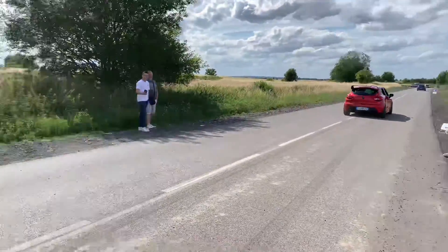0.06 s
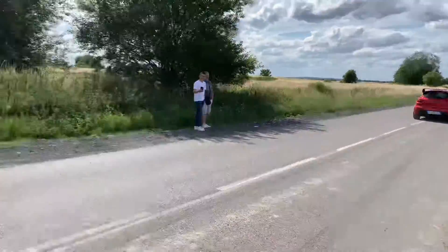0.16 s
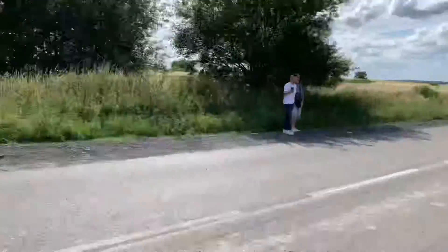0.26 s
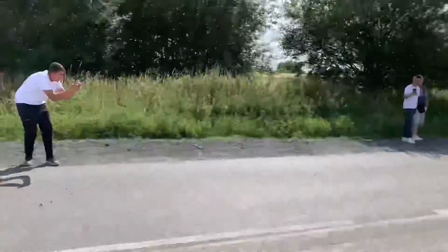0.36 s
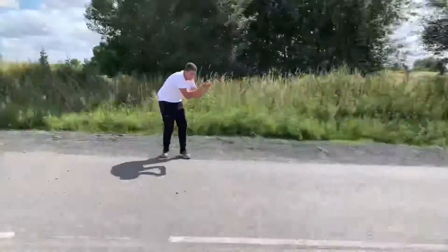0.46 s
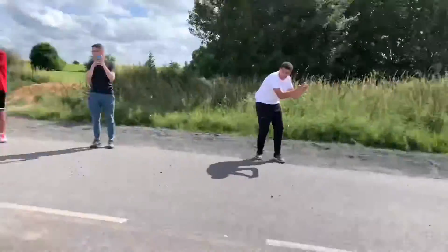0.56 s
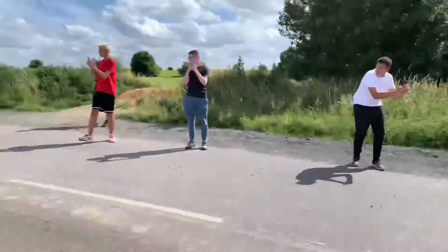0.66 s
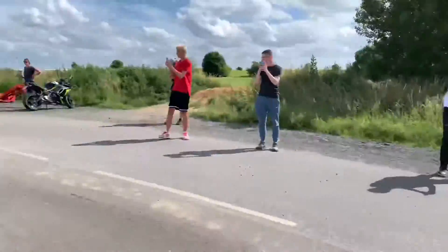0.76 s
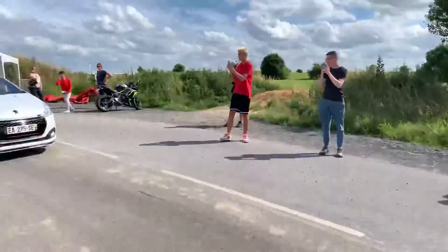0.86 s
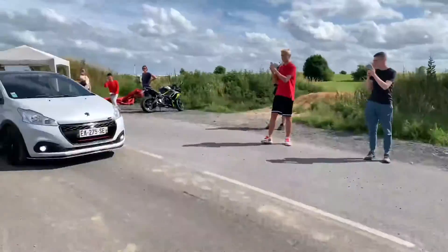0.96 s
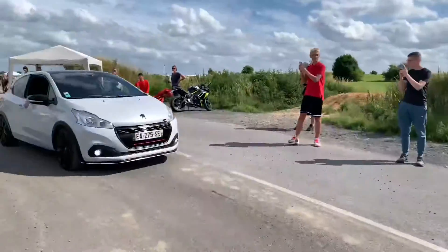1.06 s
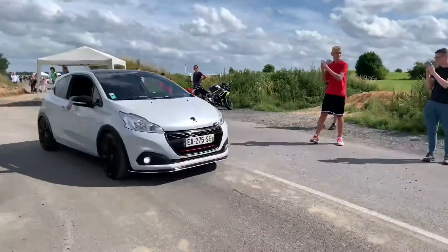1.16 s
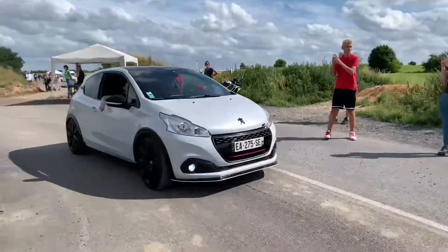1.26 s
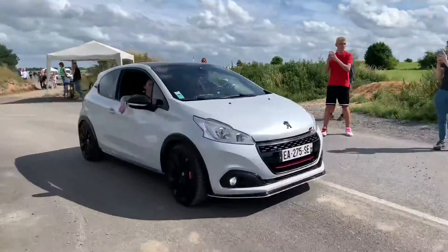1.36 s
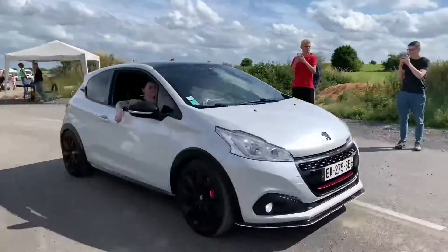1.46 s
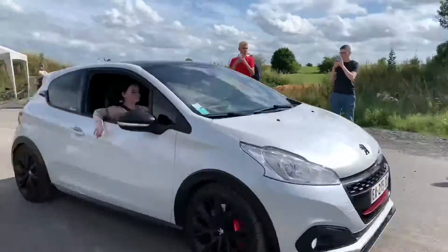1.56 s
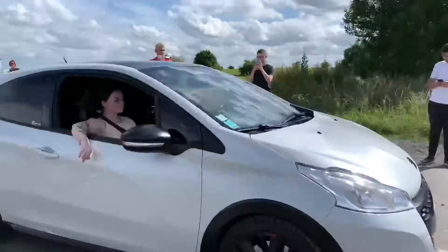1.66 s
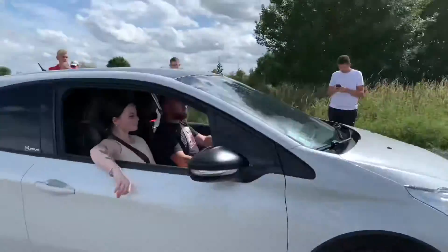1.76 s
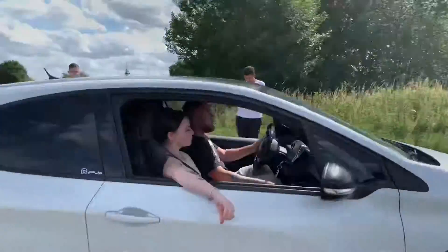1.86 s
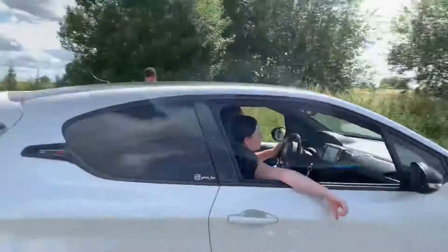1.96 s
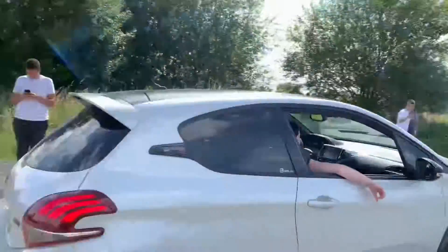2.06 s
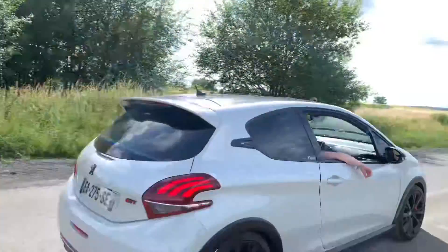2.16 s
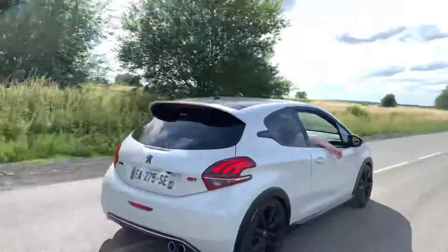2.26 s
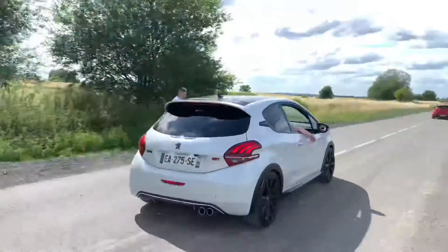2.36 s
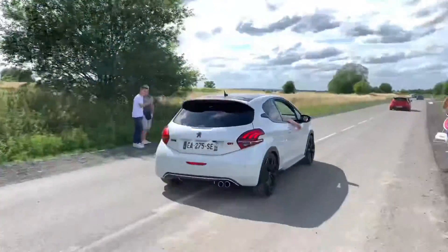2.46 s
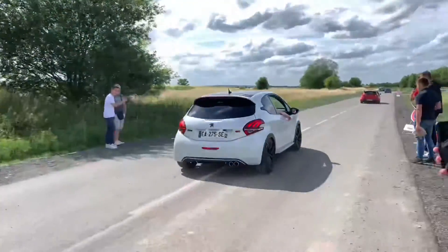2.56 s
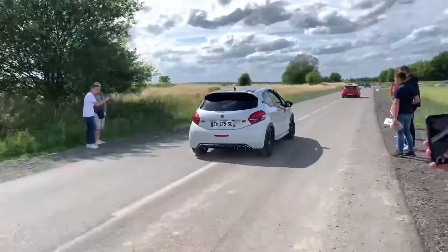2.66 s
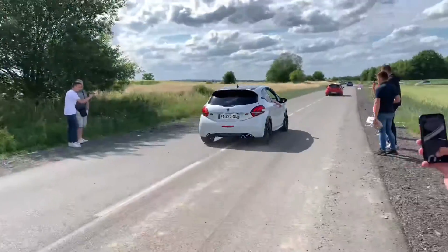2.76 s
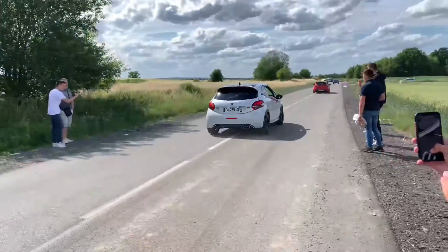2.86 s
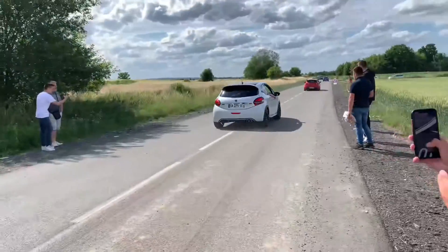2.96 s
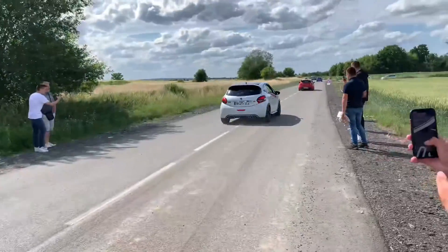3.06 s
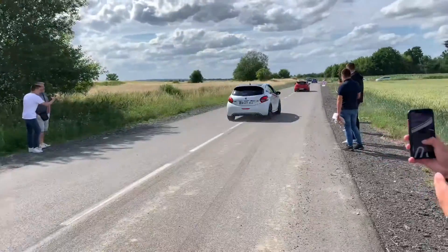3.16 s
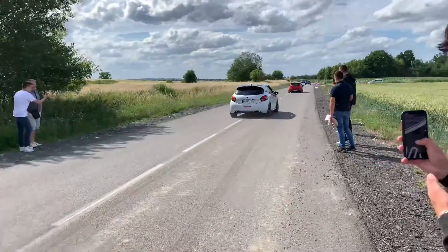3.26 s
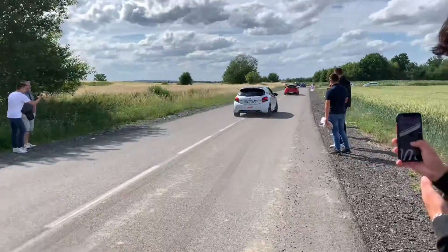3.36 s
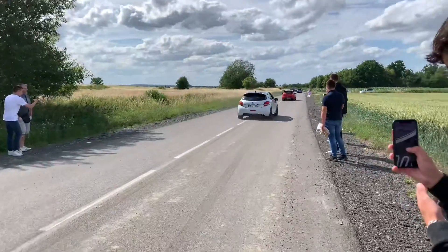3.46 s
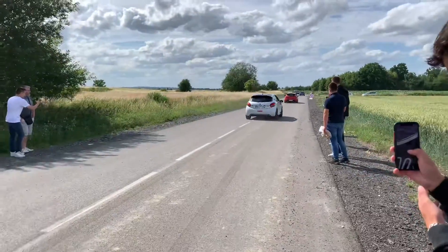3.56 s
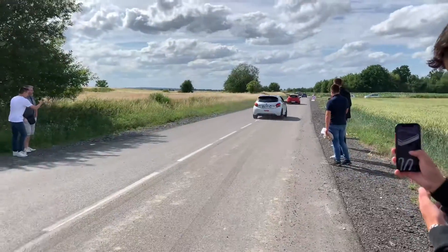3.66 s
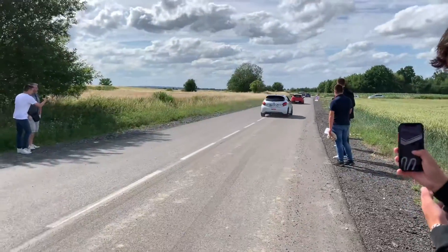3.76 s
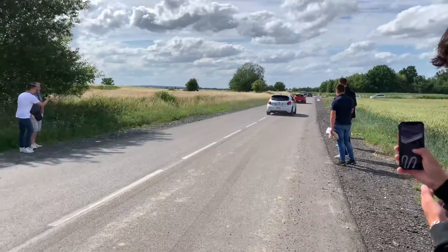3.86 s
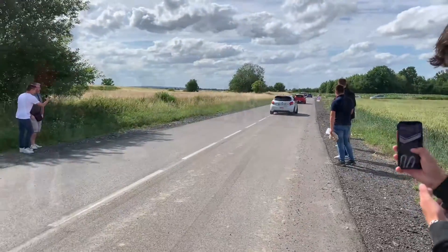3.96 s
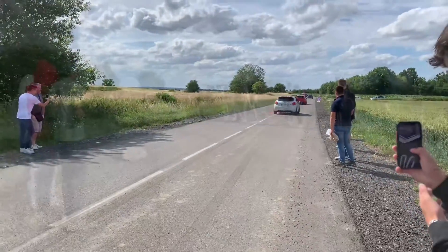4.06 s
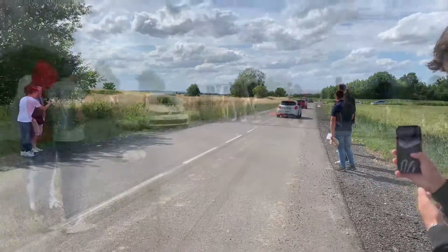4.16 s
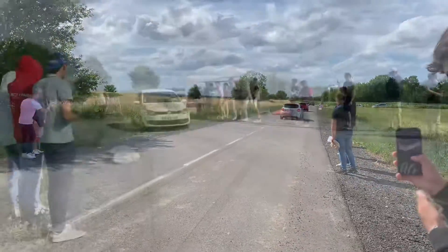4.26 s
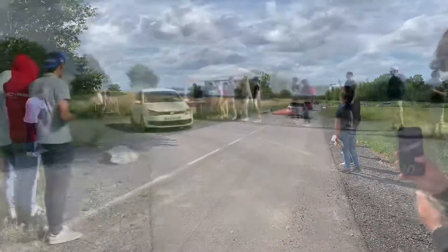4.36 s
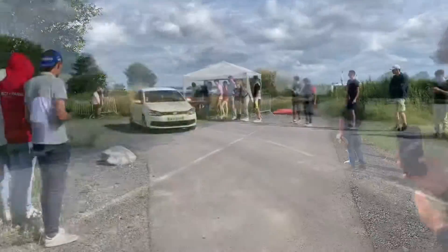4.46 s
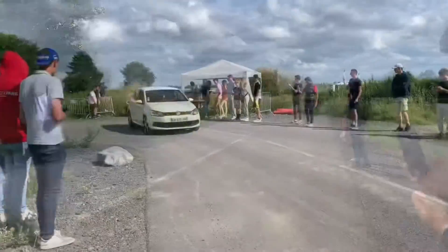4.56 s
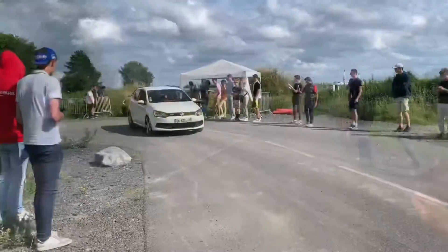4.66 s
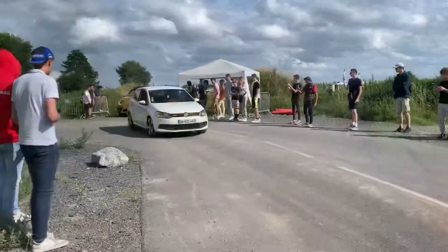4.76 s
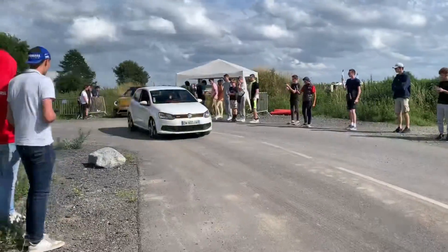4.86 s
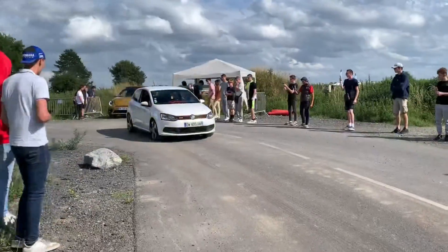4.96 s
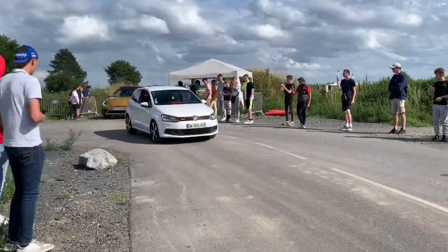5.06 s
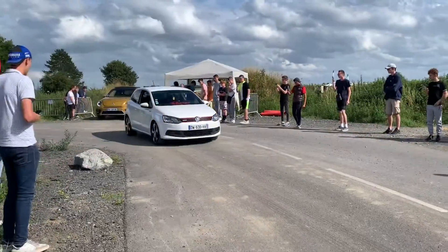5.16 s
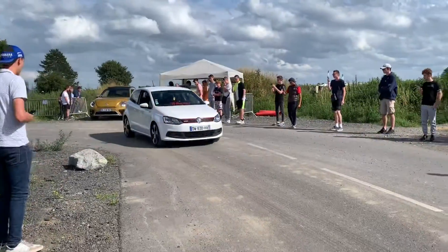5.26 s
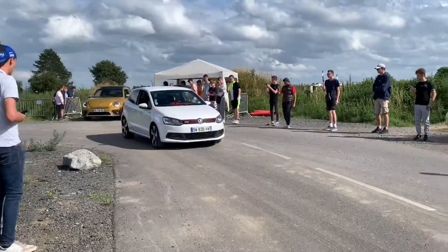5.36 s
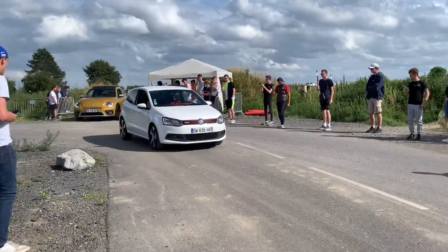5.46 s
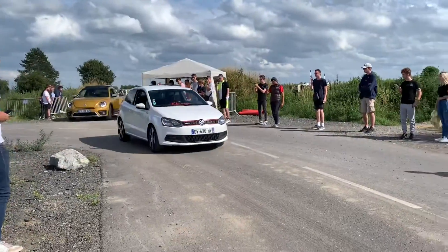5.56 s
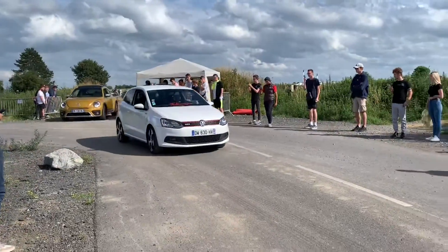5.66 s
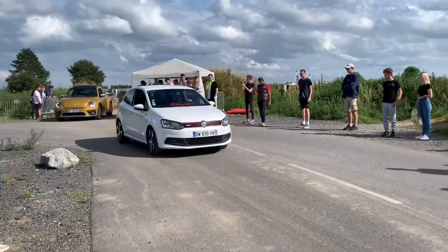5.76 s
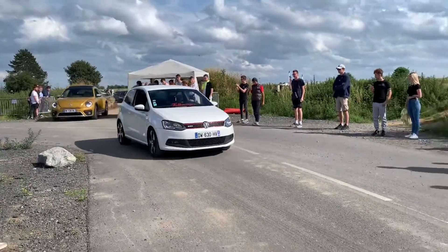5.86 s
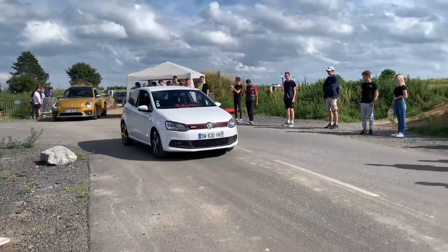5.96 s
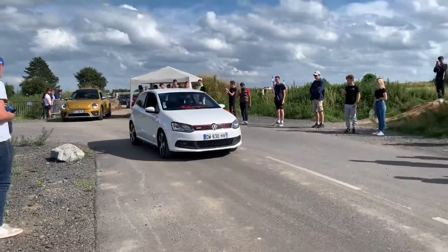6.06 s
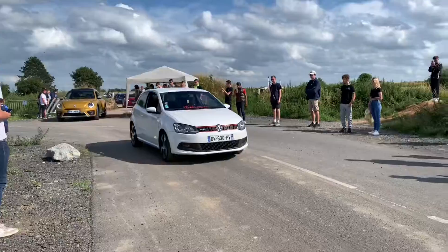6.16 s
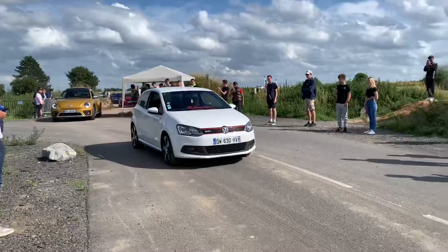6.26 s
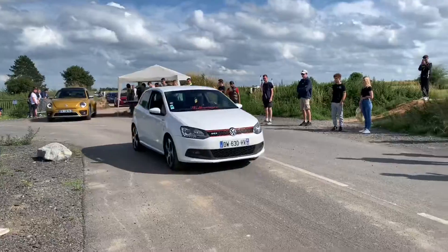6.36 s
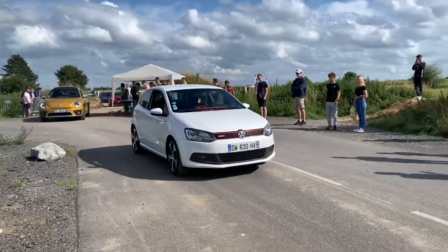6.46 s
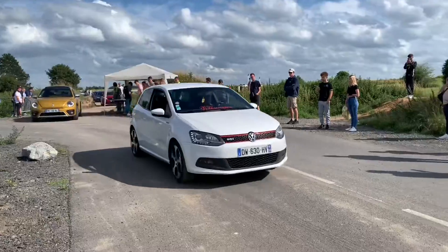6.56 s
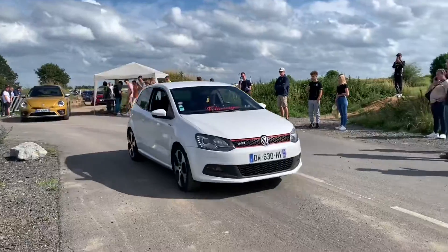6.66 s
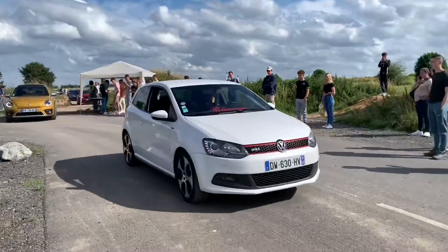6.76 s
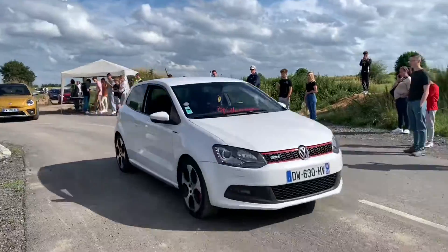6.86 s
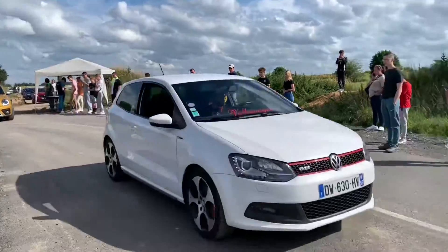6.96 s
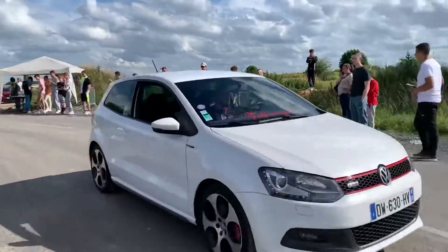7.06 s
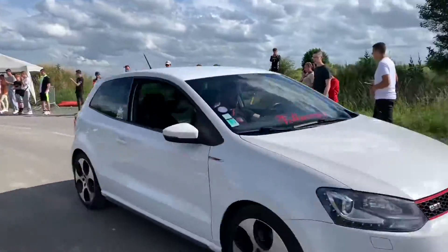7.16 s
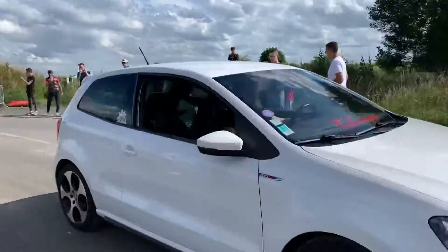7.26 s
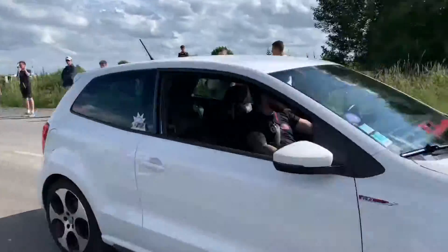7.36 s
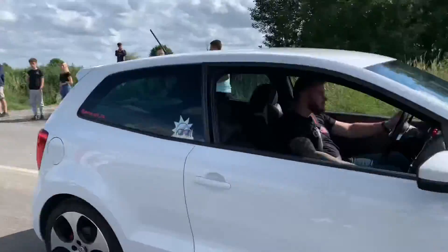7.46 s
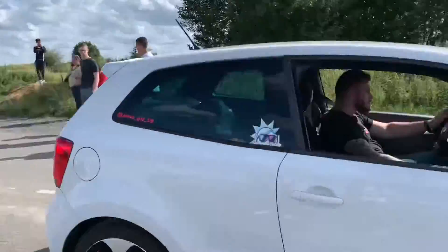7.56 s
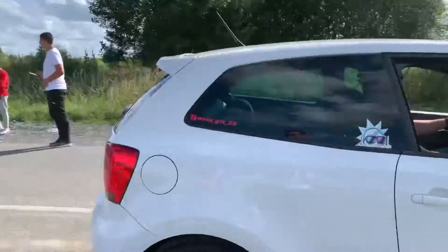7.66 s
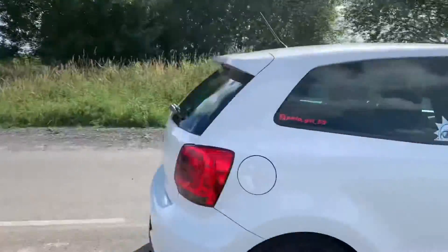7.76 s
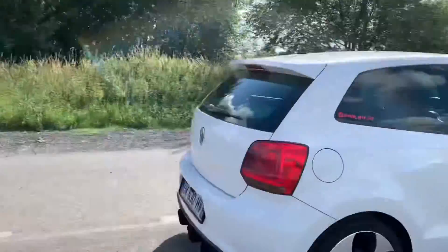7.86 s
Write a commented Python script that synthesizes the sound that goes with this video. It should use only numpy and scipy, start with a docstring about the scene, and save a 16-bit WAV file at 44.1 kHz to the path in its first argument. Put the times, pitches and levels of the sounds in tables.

```python
"""Two small four-cylinder cars pull away one after the other on a country road, close past a recorder.
Each firing pulse rings pipe, intake and tailpipe resonances, with clean sine booms underneath.
The first car revs out, lifts off with a crack, pops and is heard far off in another gear; the second
rolls near with a banded whirr and booms past. Shaped noise makes the rolling sound and the wind on the
microphone ports; struck modes make a few dull knocks, and gliding sines make thin squeaks."""
import sys
import numpy as np
from scipy import signal
from scipy.fft import rfft, irfft
from scipy.io import wavfile
from scipy.ndimage import uniform_filter1d, map_coordinates

SR = 44100
rng = np.random.default_rng(int(sys.argv[2]) if len(sys.argv) > 2 else 0)


def persist_wave(psi):
    """Save psi, clipped to +-1, as 16-bit WAV."""
    counts = np.round(np.clip(psi, -1, 1) * 32767).astype(np.int16)
    wavfile.write(sys.argv[1], SR, np.atleast_2d(counts).T)


N = 348831

# Engine levels of the cars. Each row: time in seconds, base level of the firing tone in dB,
# base level of the exhaust rasp in dB.
FIRST_LEVELS = [(0.0, -62, -82), (0.36, -32, -45.5), (0.5, -33, -36.5), (0.53, -29.5, -36.5),
                (0.74, -33, -34.5), (0.9, -20.5, -27.5), (1.24, -19, -21), (1.6, -15, -16.5),
                (1.85, -14, -15), (1.97, -16.5, -15.5), (2.03, -14.5, -21.5), (2.12, -17.5, -24),
                (2.3, -22.5, -19), (2.53, -21, -22), (2.79, -31.5, -24), (2.825, -31.5, -39),
                (3.01, -30.5, -46), (3.031, -25, -28), (3.151, -39.5, -39), (3.31, -32.5, -30),
                (3.46, -36, -33.5), (3.53, -33, -41), (3.6, -35, -59)]
FAR_LEVELS = [(3.68, -44.5, -51), (4.126, -42, -64.5), (4.75, -55, -81)]   # the first car far off in another gear
SECOND_LEVELS = [(4.6, -47, -69.5), (5.31, -48, -61), (5.78, -73, -58), (5.98, -41, -52.5),
                 (6.18, -47.5, -50.5), (6.53, -41.5, -54), (6.89, -30.5, -38), (7.12, -25, -35),
                 (7.25, -29.5, -54), (7.33, -19, -56), (7.42, -14, -57), (7.52, -16, -38),
                 (7.65, -15.5, -52.5), (7.91, -16.5, -58)]
# Engine speeds before flywheel smoothing. Each row: time in seconds, firings per second.
FIRST_REVS = [(0.0, 62.5), (0.5, 73), (0.74, 83), (0.9, 91), (1.24, 110.4), (1.6, 142), (1.85, 168),
              (1.97, 182), (2.03, 187), (2.12, 190.5), (2.3, 200), (2.53, 201), (2.79, 199), (3.01, 191),
              (3.15, 167), (3.31, 140.6), (3.46, 116.4), (3.6, 93.7)]
FAR_REVS = [(3.68, 128.7), (4.126, 117), (4.75, 105)]
SECOND_REVS = [(4.6, 62.5), (5.4, 63.8), (5.62, 65), (5.79, 75), (6.07, 81), (6.18, 82), (6.53, 96),
               (6.8, 107), (6.95, 116.5), (7.13, 119.5), (7.25, 117.5), (7.4, 114), (7.6, 108),
               (7.91, 99.5)]
# Character of the four cylinders before the unevenness scales it: strength in dB; lateness in firing gaps.
CYLINDER_DB = [5, 3, -3, 5.5]
CYLINDER_LATE = [-0.024, 0.055, -0.04, 0.13]
# How unlike the cylinders fire. Each row: firings per second, share from 0 to 1.
UNEVEN = [(65, 0.49), (110, 0.44), (165, 0.87), (195, 1)]
# Cycle-to-cycle roughness off the overrun. Each row: firings per second, roughness from 0 to 1.
ROUGH = [(65, .1), (110, .09), (165, .1), (190, .04)]
OVERRUN_FALL_PER_S, OVERRUN_ROUGH = 150, .06   # firings/s lost per s at full overrun; roughness it adds
OVERRUN_MULTIPLES_DB = -2   # the clean multiples sink on the overrun
FIRST_PUFF, SECOND_PUFF = .55, .5   # turbulent gas behind each pulse

# Resonances. Each row: centre in Hz, width in Hz, relative level in dB.
FIRST_PIPE = [(300, 280, -4.5), (438, 79, 4.5), (513.3, 43, 8.5), (572.4, 95, 7), (759, 52, 1)]
SECOND_PIPE = [(54.6, 140, 6.5), (327, 54, 5), (512, 45, 5), (762, 39, 4.5), (1200, 73, -1)]
TAILPIPE = [(915, 220, 18), (1273, 150, 19.5), (1726, 59, 9), (2027, 230, 9), (2420, 260, 10),
            (2760, 500, 3.5), (3170, 300, -1), (3920, 160, 4), (5000, 150, -17), (6560, 170, -0.5)]
INTAKE = [(670, 61, -1), (683, 75, 7.5), (1236, 124, 0), (1800, 110, -8), (2450, 81, -28)]   # heard from the front only
INTAKE_DB = -2.5   # against the rasp
INTAKE_HIDES_AT_M, INTAKE_HIDES_OVER_M = -3.2, 0.62   # the bonnet passes and the body hides the intake
# Bite of the tailpipe against the rasp, in dB, by the side the car shows.
TAILPIPE_DB = {"front": -48, "behind": 3.5}
BITE_LOSS_DB_PER_M, BITE_FADES_OVER_M = 0.77, 9.4   # extra fading of the bite once past, then it holds
DULLING_DB_PER_M_KHZ = 0.2   # the bite dulls with distance along the road
# Band of the tailpipe jet: low edge and high edge in Hz.
JET_HZ = [850, 3380]
JET_DB, JET_LOSS_DB_PER_M = -13, 1.1   # against the rasp; fading with distance along the road
JET_BEAT = .65   # share of the jet that beats with the firings

# Base levels of the 2nd, 3rd and 4th multiple of the firing tone, in dB against the tone.
FIRST_MULTIPLES = [0.37, -4.5, -12]
FAR_MULTIPLES = [-9, -23, -13]
SECOND_MULTIPLES = [-1.1, -41, -12]
# How the silencers pass a multiple, by the side the car shows. Each row: pitch in Hz, gain in dB.
FIRST_SILENCER = {"front": [(130, 14.5), (200, -11), (300, -5.5), (380, -5), (440, -11.5), (530, 12.5),
                  (610, 11.5), (680, -13), (800, 3)], "behind": [(130, 4.5), (200, -21), (300, -4),
                  (395, -1), (450, 14), (530, 12), (610, -11), (700, -6), (800, 4)]}
SECOND_SILENCER = {"front": [(130, -6.5), (220, -6.5), (350, -3), (440, -13), (490, 9)],
                   "behind": [(130, 34), (220, -3), (350, -26), (440, -23), (490, -17)]}
MULTIPLES_FOLLOW_RASP = 0.48   # how far the multiples lean from the tone's level to the rasp's
TONE_WAVERS_DB = 1.4

ROLL_M_PER_FIRING, LANE_M = .062, 1.7   # road covered per firing; closest distance across the road
# Place along the road in metres as each engine is first heard; negative is still approaching.
START_M = {"first": -12.8, "far": 22.0, "second": -15.5}
# Road in metres over which the car's tail comes into view.
TURN_M = {"first": .8, "second": .2}
# Share of the exhaust that the road sends back up close, from 0 to 1, by the side the car shows.
ECHO_SHARE = {"front": .25, "behind": 1.0}
PIPE_HEIGHT_M, PORT_HEIGHT_M = .25, 1.5
ECHO_FADES_M, ASPHALT_CUT_HZ = 80.0, 5000

# Exhaust cracks and pops. Each row: start in seconds, peak of the blast before ringing in dB,
# upper edge of its band in Hz.
POPS = [(0.75, -41, 5900), (2.735, -33, 5000), (2.75, -36, 4500), (2.788, -28.5, 6460), (3.020, -32, 1270),
        (3.035, -28, 300), (3.045, -31, 1200), (3.055, -38.5, 2740), (3.067, -33, 1040), (3.26, -42, 2210),
        (3.336, -40, 2200), (3.42, -41.5, 8000), (3.442, -35, 1920), (3.474, -41.5, 3000),
        (3.505, -42.5, 1390)]
# Narrow bands of the whirr as the second car nears. Each row: starting centre in Hz before the pitch
# ratio, width in Hz, relative level in dB.
WHIRR = [(670, 13, -17), (1023, 230, 14.5), (1439, 100, 14), (1536, 340, 14), (1897, 47, 10),
         (2390, 290, 9.5), (3090, 200, -1), (3580, 200, 2.5)]
# Each row: time in seconds, whirr level in dB, pitch ratio shared by all bands.
WHIRR_COURSE = [(4.6, -78.5, 1.18), (4.8, -55.5, 1), (5.9, -50.5, 1.02), (6.3, -45, 1.08),
                (6.55, -44.5, 1.13), (6.62, -39, 1.1), (6.75, -36, 1.14), (6.95, -37, 1.14),
                (7.15, -34.5, 1.17), (7.3, -56, 1.2), (7.91, -67, 1.3)]
WHIRR_WAVERS_DB = 1.5
# Thin squeaks. Each row: start in seconds, length in seconds, from Hz, to Hz, peak level in dB.
SQUEAKS = [(4.77, .07, 6500, 6750, -64), (4.98, .1, 6700, 6600, -69), (5.11, .1, 6550, 6450, -66)]
# Tyres, intake and fans. Each row: time in seconds, roar level in dB, hiss level in dB.
ROLL = [(0.0, -43.5, -84), (0.4, -45, -55.5), (0.55, -39, -47.5), (0.9, -49, -38.5), (1.2, -31, -31.5),
        (1.5, -33, -23), (1.68, -23.5, -23.5), (1.75, -26, -24), (2.0, -23.5, -25.5), (2.11, -32, -20),
        (2.2, -25.5, -26.5), (2.35, -33, -28.5), (2.55, -34, -39.5), (2.75, -34, -39), (2.89, -40, -50.5),
        (3.5, -40, -46.5), (4.1, -48.5, -79), (4.4, -55, -78.5), (4.75, -53.5, -59), (5.84, -50.5, -52),
        (6.3, -48, -42), (6.55, -54, -40.5), (6.62, -41, -36), (6.8, -39.5, -33.5), (6.98, -37, -30),
        (7.15, -37, -27.5), (7.3, -33, -29.5), (7.6, -38, -32), (7.91, -33.5, -38)]
# Colours of the rolling noise. Each row: frequency in Hz, relative density in dB per Hz.
ROAR = [(88, 14.5), (150, 10.5), (228, 9.5), (387, -10), (477, 14.5), (638, -33), (749, 1), (852, 4.5),
        (970, 3.5), (1220, 3), (1450, 2.5), (1680, 4), (1950, 1), (2400, -7), (7000, -27.5), (9100, -56),
        (15400, -120)]
HISS = [(300, 0), (950, 4), (1500, 4), (2000, 6.5), (2500, 7.5), (4500, 2.5), (6700, -1.5), (8700, 1.5),
        (11000, -0.5), (13500, -4.5), (15300, 5), (16500, 19.5)]

# Dull knocks. Each row: start in seconds, relative strike level in dB, brightness in dB per octave.
KNOCKS = [(3.759, -32, 8.5), (4.17, -27.5, 1), (5.689, -41, -14), (6.071, -20.5, -6), (6.211, -19.5, -4.5)]
# Modes that ring in a knock. Each row: pitch in Hz, relative level in dB, 60 dB decay in seconds.
KNOCK_MODES = [(313, 4, 0.019), (493, 9.5, 0.018), (563, -6, 0.13), (737, 11.5, 0.033), (1570, 3.5, 0.028),
               (2000, -22, 0.023)]
# Wind on the ports. Each row: time in seconds, level in dB ahead of a fixed lift.
WIND = [(0.0, -32), (0.2, -31), (1.0, -30.5), (1.76, -33), (2.3, -38), (2.82, -38), (3.2, -50), (3.8, -39),
        (4.23, -50.5), (6.0, -43), (6.4, -47.5), (7.25, -36), (7.6, -33), (7.91, -32)]
# Single thumps of wind. Each row: time in seconds, strike in dB; the strongest sets the overall peak.
GUSTS = [(0.421, -11.5), (0.441, -6), (0.517, -12.5), (0.545, -17.5), (0.613, -12), (0.642, -10.5)]
# Colour of the wind. Each row: frequency in Hz, relative density in dB per Hz.
BUFFET = [(20, -34), (30, -25), (42, -5.5), (55, -0.5), (90, 2), (140, -3.5), (220, -19), (500, -20),
          (1200, -57)]
WIND_LUMPS_DB, WIND_LUMPS_PER_S = 1.8, 11

# The recorder turns. Each row: time in seconds, lead of the right port in ms.
FACING = [(0, -0.17), (.8, -0.24), (1.9, 0.18), (2.4, 0.071), (6.8, -0.045), (7.5, 0.27)]
# Each row: time in seconds, left minus right in dB.
BALANCE_DB = [(0.0, -0.5), (2.0, -0.6), (2.7, -1.1), (3.2, -1.5), (3.7, -1), (7.91, -0.8)]
# Weight of the sound that differs between the ports. Each row: frequency in Hz, weight from 0 to 1.
UNLIKE = [(30, 0.37), (60, 0.027), (300, 0.4), (1500, 0.93), (4000, 0.96), (5600, 1), (7500, 0.008),
          (9000, 0.0044), (16000, 0.11)]
# The recorder widens the image. Each row: frequency in Hz, phase between the channels in turns.
WIDENING = [(40, 0), (90, -.05), (170, -.19), (290, -.5), (450, -.76), (650, -1), (1000, -1.17),
            (2000, -1.08), (4000, -1.06), (6300, -1), (8750, -.5), (11000, 0), (13550, .5), (16000, 1)]
CUTOFF_HZ = 16300


def amp(db):
    """dB to gain."""
    return 10 ** (np.asarray(db) / 20)


def rms_one(x):
    """Scale to rms 1."""
    return x / np.sqrt(np.mean(x ** 2) + 1e-20)


def in_time(rows):
    """Columns of a table as curves over all samples."""
    s, *columns = np.transpose(rows)
    return [np.interp(np.arange(N) / SR, s, c) for c in columns]


def at_hz(points, hz):
    """Read a spectrum on a log-frequency axis."""
    points_hz, values = np.transpose(points)
    return np.interp(np.log(hz + 1), np.log(points_hz), values)


def drift(rate):
    """Slow random wander of about unit spread, faster at a higher rate."""
    r = np.exp(-80 * np.pi * rate / SR)
    noise = rng.standard_normal(N // 40 + 2002)   # one value per 40 samples, plus settling time
    slow = signal.lfilter([1], [1, -2 * r, r * r], noise)[2000:]
    return np.interp(np.arange(N) / 40, np.arange(len(slow)), rms_one(slow))


def delayed(x, ms):
    """Read x later by a fixed or moving lag."""
    return map_coordinates(x, [np.arange(N) - ms * SR / 1000], order=3, mode="nearest")


def band(x, low_hz, high_hz, order):
    """Butterworth band-pass."""
    return signal.sosfilt(signal.butter(order, [low_hz, high_hz], "band", fs=SR, output="sos"), x)


def resonate(x, hz, width_hz):
    """One two-pole resonance with a gain of about 1 on top."""
    r = np.exp(-np.pi * width_hz / SR)
    poles = [1, -2 * r * np.cos(2 * np.pi * hz / SR), r * r]
    return signal.lfilter([(1 - r * r) / 2, 0, (r * r - 1) / 2], poles, x + 1e-18)


def through(x, pipe, loss_db_per_khz=0):
    """Parallel resonances with alternating signs, the higher ones losing more."""
    total = np.sqrt(sum(amp(2 * db) for hz, width, db in pipe))
    out = 0
    for k, (hz, width, db) in enumerate(pipe):
        gain = amp(db - loss_db_per_khz * hz / 1000)
        out = out + (-1) ** k * gain * rms_one(resonate(x, hz, width))
    return out / total


def clicks_at(events):
    """One single-sample click per event."""
    out = np.zeros(N)
    rows = np.array(events)
    out[np.round(rows[:, 0] * SR).astype(int)] = amp(rows[:, 1])
    return out


def coloured(spectrum, patchy_db, rate):
    """Noise of a given spectrum whose octave bands waver partly on their own; two unrelated rows, rms 1."""
    hz, together = np.fft.rfftfreq(N, 1 / SR), drift(rate / 3)
    white, out = rfft(rng.standard_normal((2, N))) * amp(at_hz(spectrum, hz)), 0
    for centre in np.arange(4.5, 14.5):   # band centres as powers of two in Hz
        share = np.cos(np.pi / 2 * np.clip(np.log2(hz + 1) - centre, -1, 1)) ** 2
        out = out + irfft(white * share, N) * amp(patchy_db * (.35 * together + drift(rate)))
    return rms_one(out)


def engine(revs, levels, pipe, silencer, multiples_db, start_m, turn_m, uneven, puff):
    """A pulse per firing rings the exhaust pipe; the lowest firing tones come as clean booms."""
    tone_db, rasp_db = in_time(levels)
    rate = uniform_filter1d(in_time(revs)[0], size=3000)   # the flywheel smooths the speed
    overrun = np.clip(-np.gradient(rate) * SR / OVERRUN_FALL_PER_S, 0, 1)   # throttle shut, revs falling
    rough = np.interp(rate, *np.transpose(ROUGH)) + OVERRUN_ROUGH * overrun
    t, start_s, end_s = np.arange(N) / SR, levels[0][0], levels[-1][0]
    fade_in = np.clip((t - start_s) / .05 + (start_s == 0), 0, 1)   # none if it already runs at time 0
    running = fade_in * np.clip((end_s + .05 - t) / .05, 0, 1)
    turns = np.cumsum(rate) / SR   # counted in firings
    along_m = start_m + ROLL_M_PER_FIRING * np.cumsum(rate * running) / SR
    tail = .5 + .5 * np.tanh(along_m / turn_m)   # 0 shows the front, 1 the tail
    pulses = firing_pulses(rate, turns, rough, uneven)
    # each pulse drags a burst of turbulent gas behind it
    gas = signal.lfilter([1], [1, -.994], pulses) * rng.standard_normal(N) * puff
    firing = (pulses + rough * gas) / np.sqrt(rate)
    rasp = amp(rasp_db) * exhaust(firing, pipe, along_m, tail)
    jet_db = rasp_db + JET_DB - JET_LOSS_DB_PER_M * np.abs(along_m)
    rasp += amp(jet_db) * tail * tailpipe_jet(pulses)
    boom = firing_tones(rate, turns, tone_db, rasp_db, overrun, tail, silencer, multiples_db)
    return running * road_echo(rasp, along_m), running * boom


def firing_pulses(rate, turns, rough, uneven):
    """Four unlike cylinders fire in turn, with chance in the timing and strength of every shot."""
    shot, chance = np.arange(1, int(turns[-1])), rng.standard_normal((2000, 2))
    rough_shot = np.interp(shot, turns, rough)
    uneven = uneven * np.interp(shot, turns, np.interp(rate, *np.transpose(UNEVEN)))
    late = uneven * np.take(CYLINDER_LATE, shot % 4) + .1 * rough_shot * chance[shot, 0]
    at = np.clip(np.interp(shot + late, turns, np.arange(N)), 0, N - 2)
    size = amp(uneven * np.take(CYLINDER_DB, shot % 4) + 8 * rough_shot * chance[shot, 1])
    pulses = np.zeros(N)
    # a pulse between two samples is shared by both
    np.add.at(pulses, at.astype(int), size * (1 - at % 1))
    np.add.at(pulses, at.astype(int) + 1, size * (at % 1))
    return pulses


def exhaust(firing, pipe, along_m, tail):
    """The firings ring the pipe, the intake until the body hides it, and the biting tailpipe."""
    bite_db = TAILPIPE_DB["front"] + tail * (TAILPIPE_DB["behind"] - TAILPIPE_DB["front"])
    bite_db = bite_db - BITE_LOSS_DB_PER_M * np.clip(along_m, 0, BITE_FADES_OVER_M)
    bite = amp(bite_db) * through(firing, TAILPIPE, DULLING_DB_PER_M_KHZ * np.abs(along_m))
    in_view = .5 - .5 * np.tanh((along_m - INTAKE_HIDES_AT_M) / INTAKE_HIDES_OVER_M)
    intake = amp(INTAKE_DB) * in_view * through(firing, INTAKE)
    return through(firing, pipe) + intake + bite


def tailpipe_jet(pulses):
    """The jet of gas leaving the tailpipe rushes in beats with the firings."""
    beats = 1 - JET_BEAT + JET_BEAT * rms_one(signal.lfilter([1], [1, -.985], pulses))
    return rms_one(band(beats * rng.standard_normal(N), *JET_HZ, order=2))


def firing_tones(rate, turns, tone_db, rasp_db, overrun, tail, silencer, multiples_db):
    """Sines on the firing tone and its multiples, which the silencer passes by pitch and side."""
    tones_db = [TONE_WAVERS_DB * drift(2.8)]
    for multiple, db in enumerate(multiples_db, start=2):
        front_db = at_hz(silencer["front"], multiple * rate)
        behind_db = at_hz(silencer["behind"], multiple * rate)
        passed_db = (1 - tail) * front_db + tail * behind_db
        lean_db = MULTIPLES_FOLLOW_RASP * (rasp_db - tone_db)
        tones_db.append(db + OVERRUN_MULTIPLES_DB * overrun + passed_db + lean_db + 3.9 * drift(8.1))
    return sum(amp(tone_db + db + 2.5) * np.sin(2 * np.pi * (k + 1) * turns + k)
               for k, db in enumerate(tones_db))


def road_echo(x, along_m):
    """The road sends the exhaust back later and duller; the lag shrinks as the car draws away."""
    behind = .5 + .5 * np.tanh(along_m / LANE_M)
    flat_m2 = along_m ** 2 + LANE_M ** 2
    direct_m = np.sqrt(flat_m2 + (PORT_HEIGHT_M - PIPE_HEIGHT_M) ** 2)
    bounced_m = np.sqrt(flat_m2 + (PORT_HEIGHT_M + PIPE_HEIGHT_M) ** 2)   # from the pipe's mirror image
    share = ECHO_SHARE["front"] + behind * (ECHO_SHARE["behind"] - ECHO_SHARE["front"])
    share = share * np.exp(-direct_m / ECHO_FADES_M)
    bounce = delayed(x, 1000 * (bounced_m - direct_m) / 343)   # speed of sound in m/s
    return x + np.clip(share, 0, 1) * signal.lfilter(*signal.butter(2, ASPHALT_CUT_HZ, fs=SR), bounce)


def pops():
    """Unburnt fuel fires in the pipe: a short blast, duller or brighter, that rings the pipe."""
    out = np.zeros(N)
    for s, db, hz in POPS:
        blast = (1.2 * rng.standard_normal(600) - .6) * np.exp(-np.arange(600) / 110.0)
        blast = band(blast, hz / 5, min(hz, 15000), order=4)
        start = round(s * SR)
        out[start:start + 600] += amp(db) * blast / np.abs(blast).max()
    return out + 4.4 * resonate(out, 460, 77) + 3.4 * resonate(out, 1080, 300) + 1.7 * resonate(out, 1850, 150)


def whirr():
    """Banded whirr as the second car nears: wavering narrow bands of noise that drift in pitch together."""
    level_db, pitch = in_time(WHIRR_COURSE)
    cycles, bands = np.cumsum(pitch) / SR, 0
    for hz, width, db in WHIRR:
        # slow noise on a sine and a cosine makes a noise band around the moving centre
        blur = signal.lfilter(*signal.butter(2, width / 2, fs=SR), rng.standard_normal((2, N)))
        phase = 2 * np.pi * hz * cycles
        noise_band = blur[0] * np.sin(phase) + blur[1] * np.cos(phase)
        bands = bands + amp(db + WHIRR_WAVERS_DB * drift(6.9)) * rms_one(noise_band)
    return amp(level_db) * rms_one(bands)


def squeaks():
    """Short thin tones that glide a little."""
    out = np.zeros(N)
    for s, length, from_hz, to_hz, db in SQUEAKS:
        part = np.linspace(0, 1, round(length * SR))
        cycles = np.cumsum(from_hz + (to_hz - from_hz) * part) / SR
        start = round(s * SR)
        out[start:start + len(part)] += amp(db) * np.sin(np.pi * part) * np.sin(2 * np.pi * cycles)
    return out


def rolling():
    """Tyres, intake and fans: a low roar and a patchier hiss, as two unrelated rows."""
    roar_db, hiss_db = in_time(ROLL)
    roar = amp(roar_db) * coloured(ROAR, patchy_db=.4, rate=12)
    return roar + amp(hiss_db) * coloured(HISS, patchy_db=1.67, rate=16.6)


def knocks():
    """Dull hollow knocks: each blow strikes every decaying mode with its own strength."""
    out = 0
    for hz, db, t60 in KNOCK_MODES:
        r, w = amp(-60 / (t60 * SR)), 2 * np.pi * hz / SR
        octaves = np.log2(hz / KNOCK_MODES[3][0])   # brightness pivots on the fourth mode
        blows = clicks_at([(s, strike_db + tilt_db * octaves) for s, strike_db, tilt_db in KNOCKS])
        ring = signal.lfilter([0, np.sin(w)], [1, -2 * r * np.cos(w), r * r], blows + 1e-18)
        out = out + amp(db - 15.0) * ring
    return out


def wind():
    """Lumpy low noise on the ports, with a few single thumps that are weaker and later in the second row."""
    thumps = resonate(resonate(clicks_at(GUSTS), 39, 57), 88, 91)
    thumps *= amp(np.max(np.array(GUSTS)[:, 1])) / np.abs(thumps).max()
    air = amp(in_time(WIND)[0] + 4.5) * coloured(BUFFET, WIND_LUMPS_DB, WIND_LUMPS_PER_S)
    return air[0] + thumps, air[1] + 0.14 * delayed(thumps, 2.2)


def ports(near, other):
    """Left and right ports: the same sound, a part that differs, and a lag below the treble."""
    hz = np.fft.rfftfreq(N, 1 / SR)
    unlike = np.clip(at_hz(UNLIKE, hz), 0, 1)
    other = irfft(rfft(other) * np.sqrt(unlike / 2), N)
    left, right = near + other, near - other
    low = irfft(rfft(right) * np.clip((6200 - hz) / 1200, 0, 1), N)   # fades out from 5000 to 6200 Hz
    right = right - low + delayed(low, -in_time(FACING)[0])
    pan_db = in_time(BALANCE_DB)[0] / 2
    return np.array([left * amp(pan_db), right * amp(-pan_db)])


def scene():
    """Cars, rolling noise, wind and knocks meet at the two ports."""
    first = engine(FIRST_REVS, FIRST_LEVELS, FIRST_PIPE, FIRST_SILENCER, FIRST_MULTIPLES,
                   START_M["first"], TURN_M["first"], uneven=1.048, puff=FIRST_PUFF)
    far = engine(FAR_REVS, FAR_LEVELS, FIRST_PIPE, FIRST_SILENCER, FAR_MULTIPLES,
                 START_M["far"], TURN_M["first"], uneven=0.84, puff=FIRST_PUFF)
    second = engine(SECOND_REVS, SECOND_LEVELS, SECOND_PIPE, SECOND_SILENCER, SECOND_MULTIPLES,
                    START_M["second"], TURN_M["second"], uneven=0.57, puff=SECOND_PUFF)
    rasp, boom = np.sum([first, far, second], axis=0)
    roll = rolling()
    cars = rasp + amp(10) * pops() + whirr() + squeaks() + roll[0]
    air = wind()
    # roadside bushes send back a scattered copy that differs between the ports
    scattered = 0.8 * delayed(rasp, 11.) + 0.84 * roll[1]
    return ports(cars + boom + knocks() + air[0], scattered + air[1])


def record(dry):
    """A phase turn widens the image, peaks are rounded, and the deepest bass and the top are cut."""
    hz = np.fft.rfftfreq(N, 1 / SR)
    half = np.pi * np.interp(hz, *np.transpose(WIDENING))   # each channel turns half, in opposite senses
    wide = irfft(rfft(dry) * np.exp(1j * half * [[-1], [1]]), N)
    wide = 1.4 * np.tanh(wide / 1.4)   # the loudest peaks are rounded
    wide = signal.sosfilt(signal.butter(3, 36, "high", fs=SR, output="sos"), wide)
    return signal.sosfilt(signal.cheby2(12, 70, CUTOFF_HZ, fs=SR, output="sos"), wide)


dry = scene()
out = record(dry)
persist_wave(out)
```